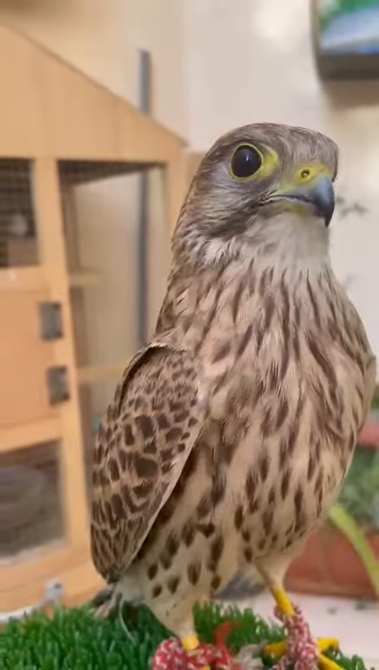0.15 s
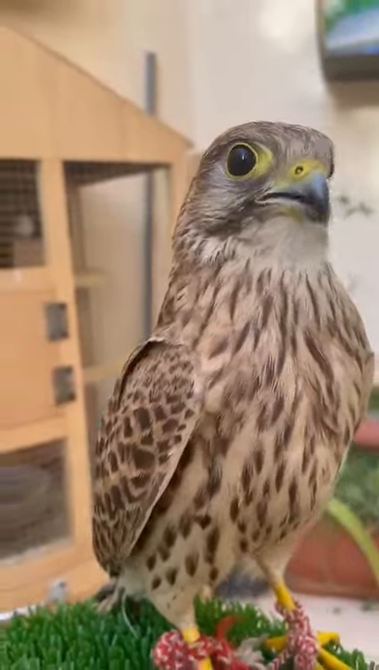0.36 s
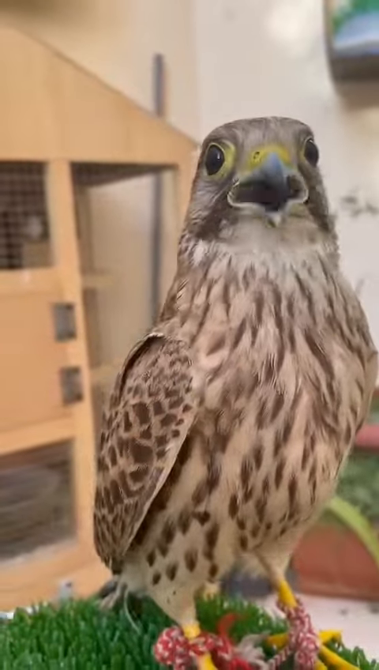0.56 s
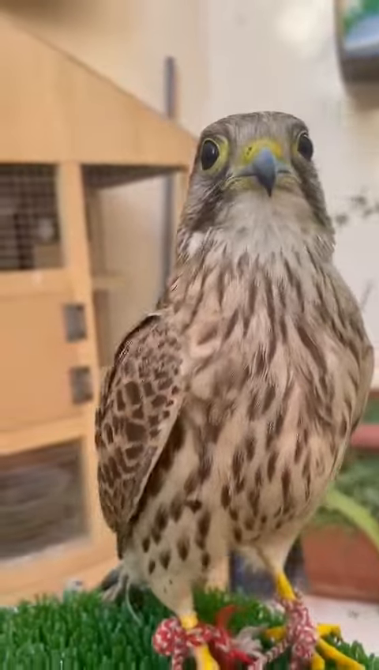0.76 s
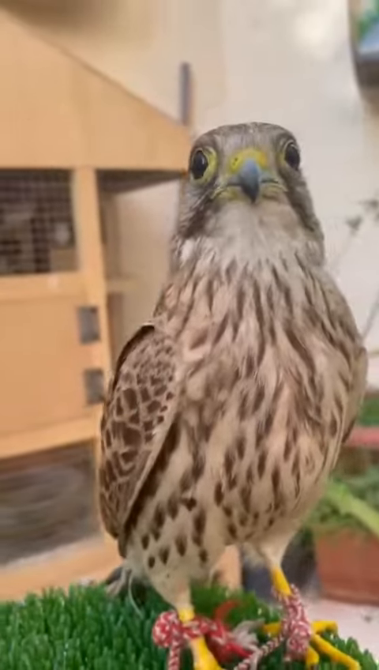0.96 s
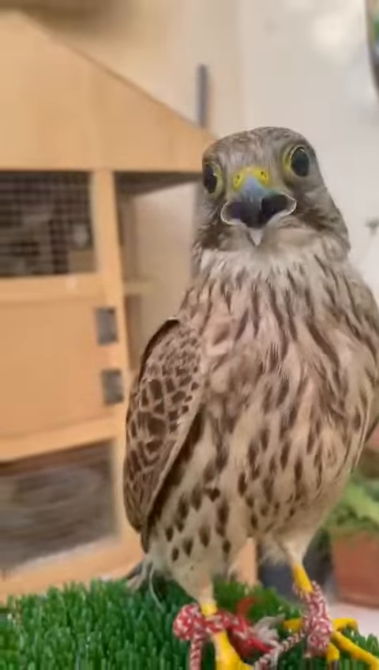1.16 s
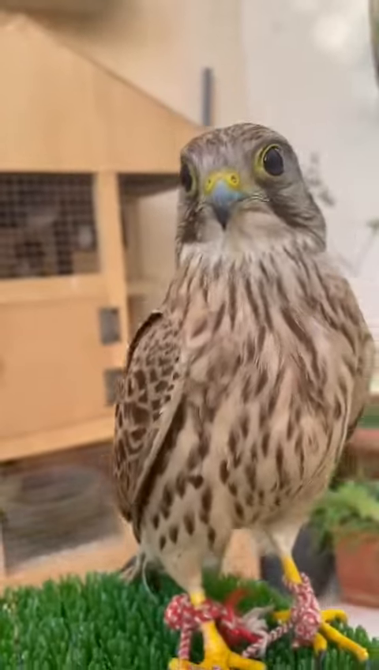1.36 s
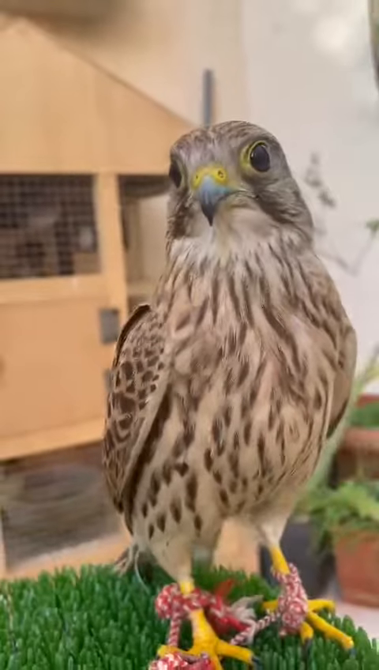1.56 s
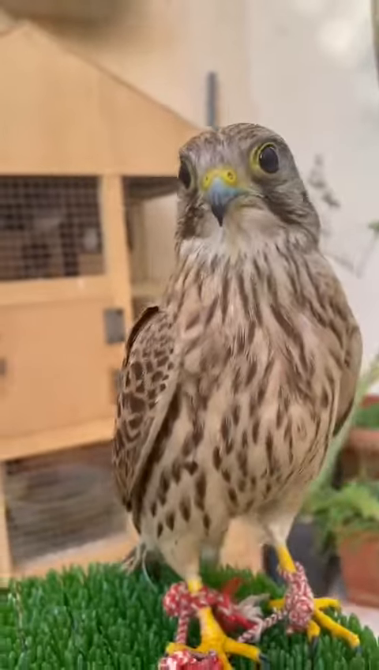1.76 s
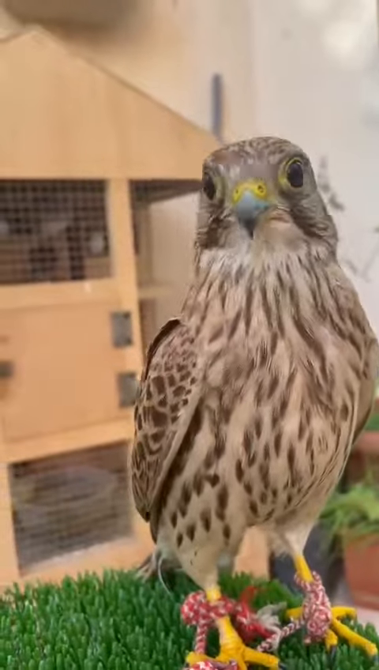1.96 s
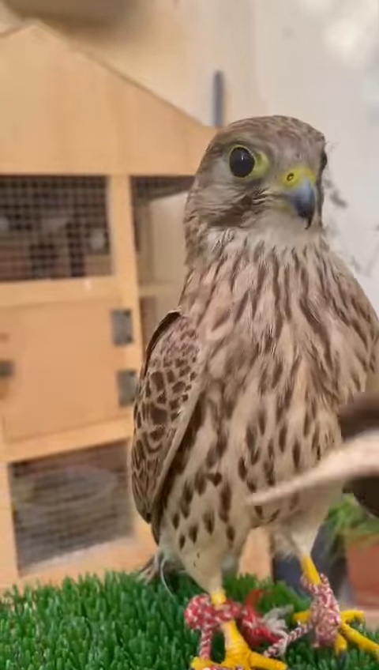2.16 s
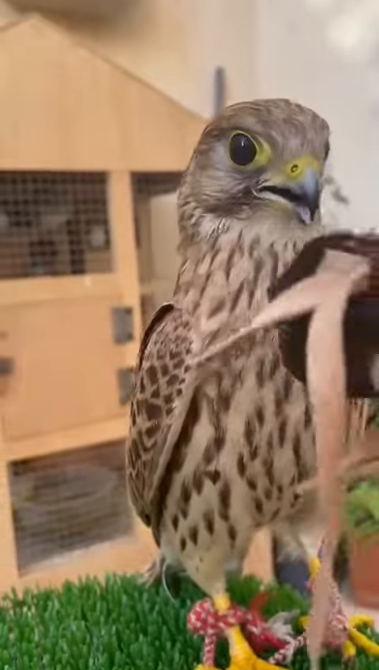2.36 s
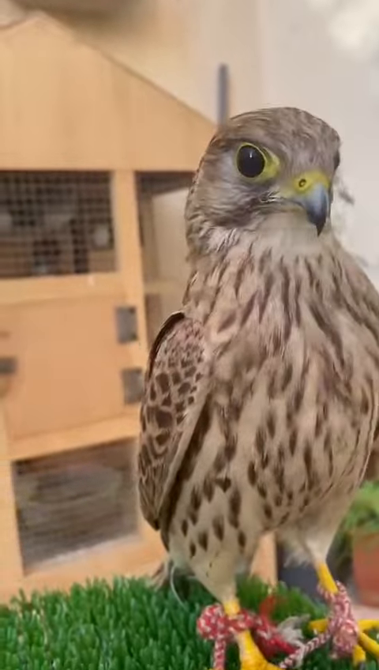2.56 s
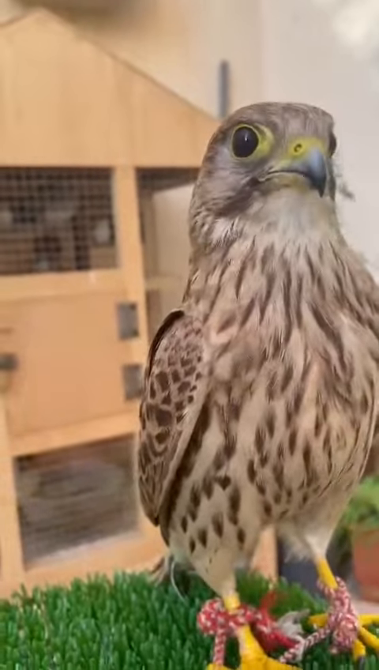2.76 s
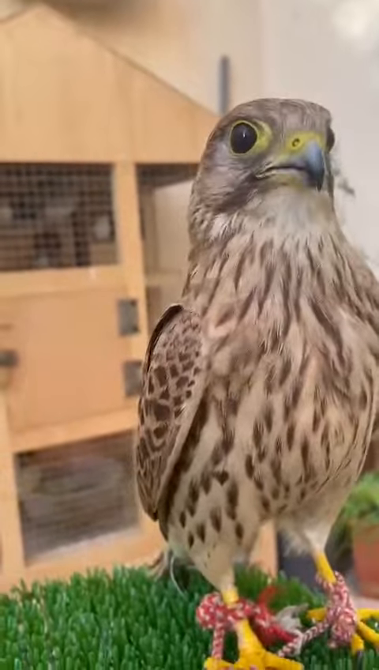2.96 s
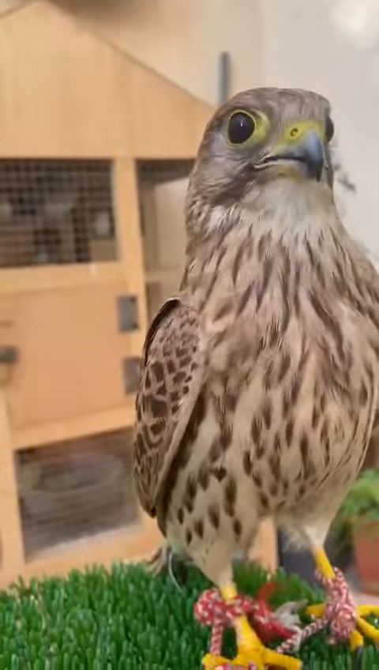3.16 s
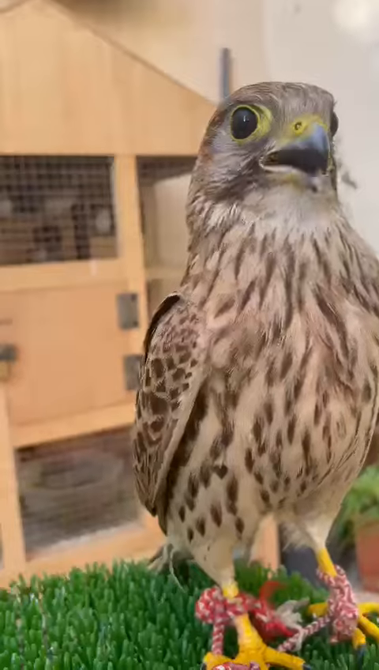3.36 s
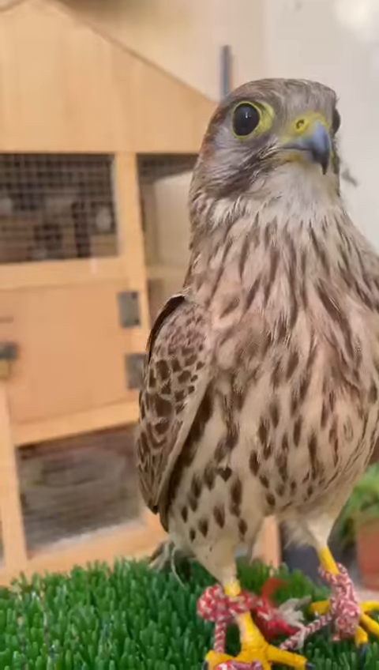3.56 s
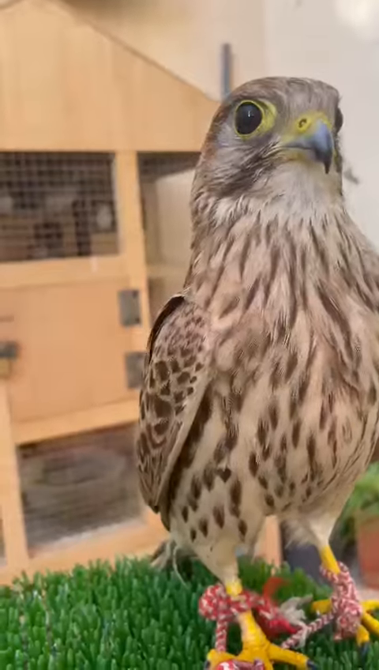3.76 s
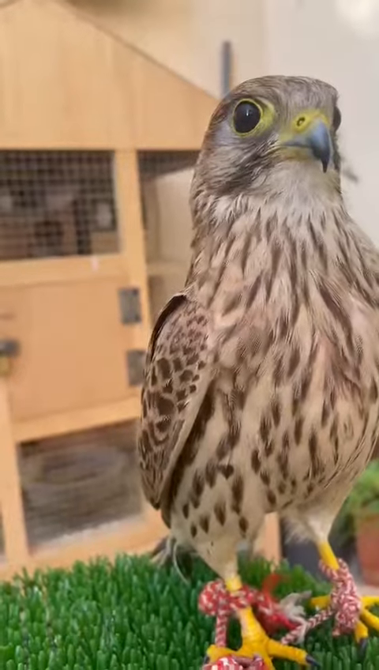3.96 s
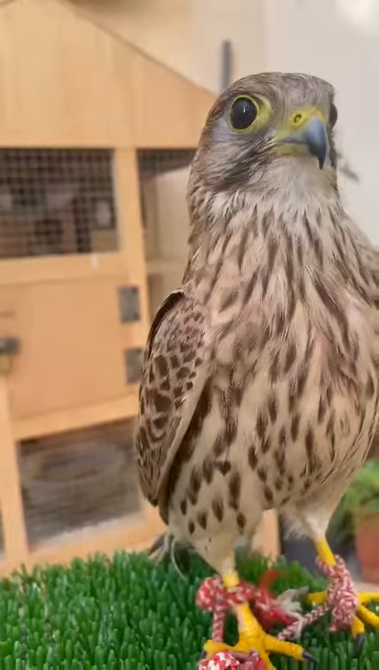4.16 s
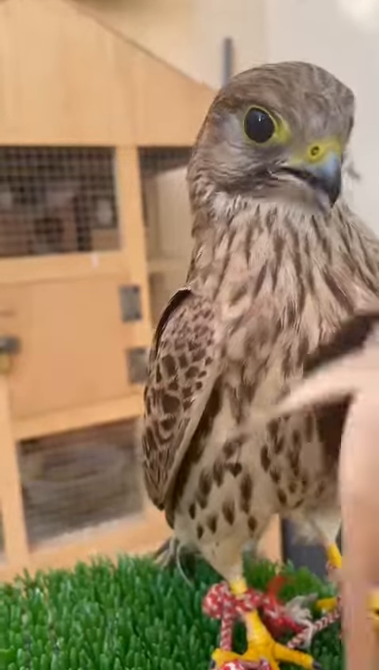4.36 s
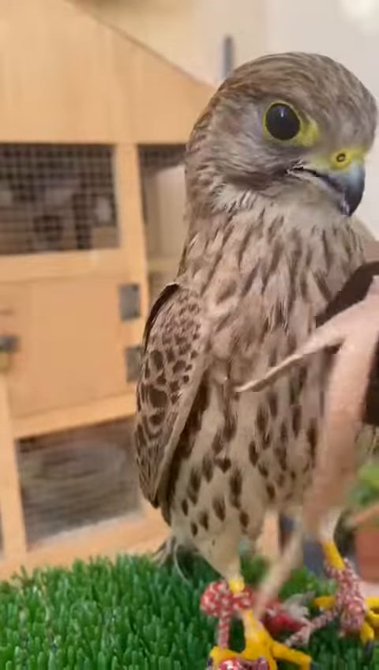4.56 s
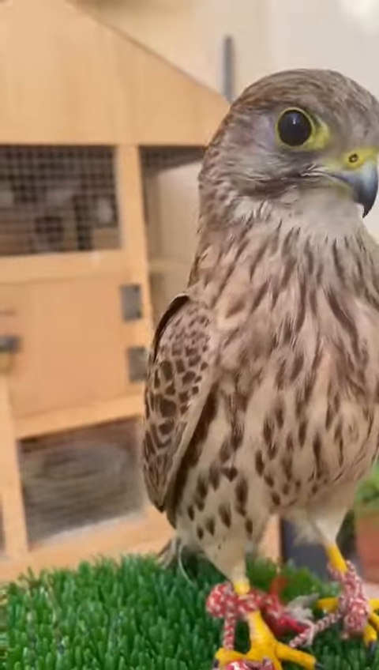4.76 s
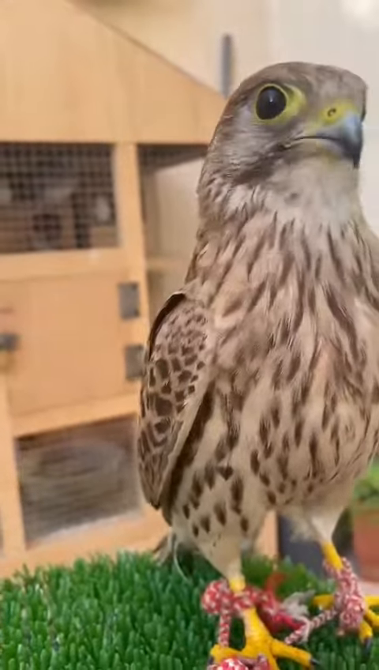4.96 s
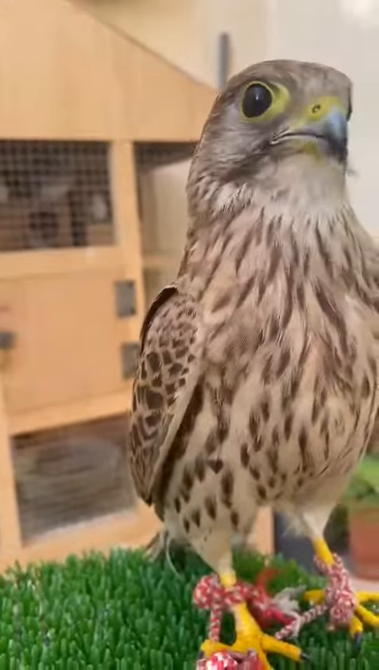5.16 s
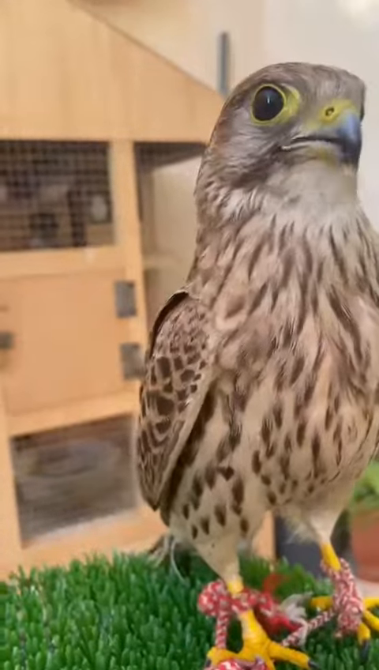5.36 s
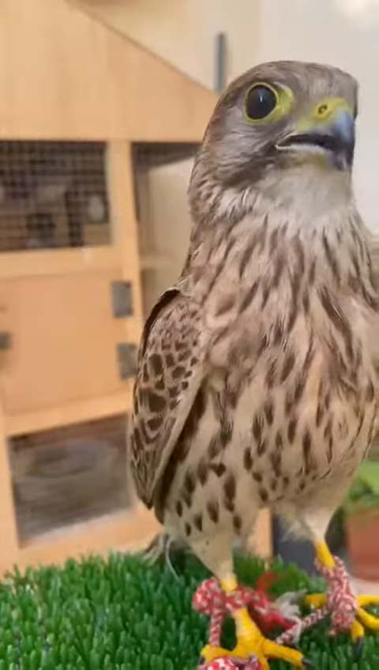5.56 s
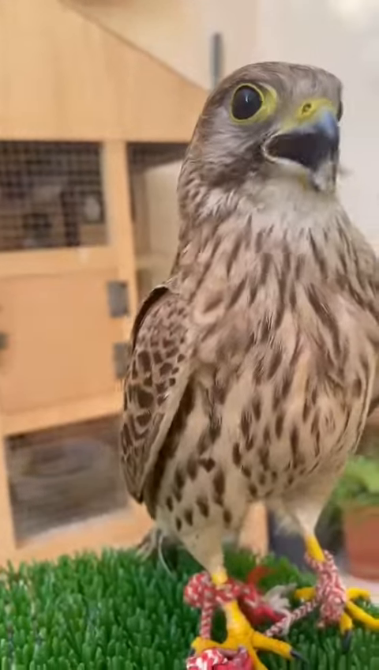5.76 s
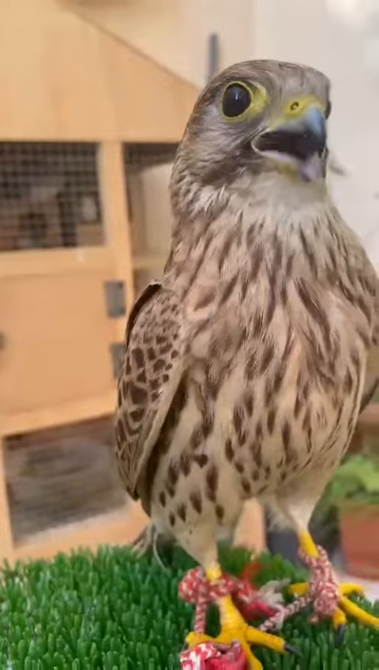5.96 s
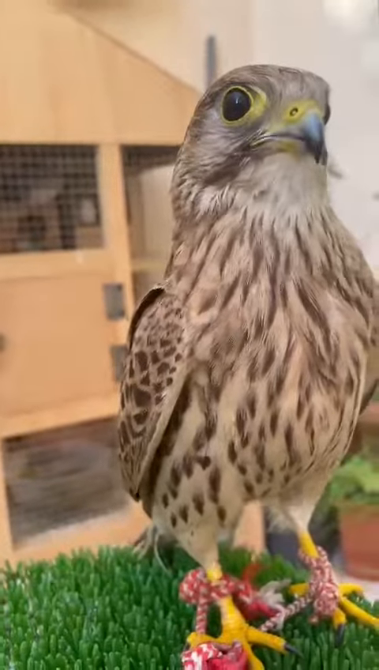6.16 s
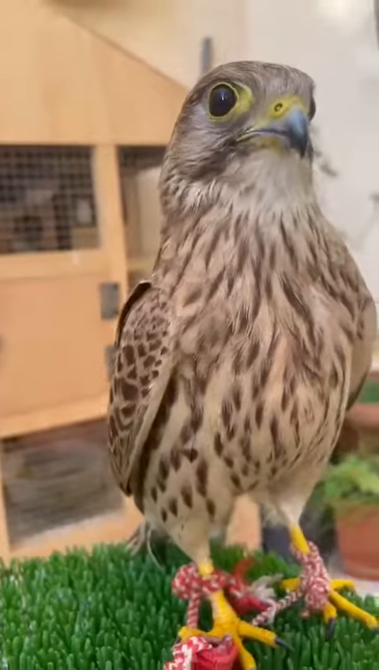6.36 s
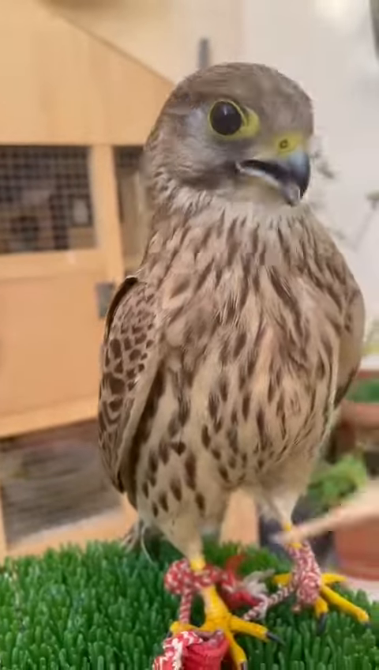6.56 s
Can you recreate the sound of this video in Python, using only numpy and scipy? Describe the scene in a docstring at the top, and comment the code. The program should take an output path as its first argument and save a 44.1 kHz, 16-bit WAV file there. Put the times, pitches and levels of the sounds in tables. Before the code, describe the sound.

A kestrel calls close to a phone in a walled yard. From 0.05 to 1.5 seconds come six sharp keks, roughly 0.3 seconds apart, each under a tenth of a second: a dry throat rasp, a hoarse upward sweep, then a cracked note or short squeal that sags. A pause leaves soft air, a steady hum near 620 Hz and, around 1.9, a faint high whine. A softer kek at 2.27 opens the second run, quicker and shriller, strongest near 3.1 and ending at 3.4. Low rumble swells around 2.8. After a second of quiet, with a barely audible far animal cry at 4.0, a longer, clearer squawk at 4.47 begins the third run, growing rougher, keks every 0.2 to 0.3 seconds until 6.6. Faint blurred distant calls lie beneath from about 6.0. The walls add a short, diffuse, dull echo.

```python
"""Kestrel scolding in a walled yard

A perched kestrel scolds in three runs of kek-kek-kek, close to a phone in a walled aviary yard.
Flap ticks make the dry rasp that opens most keks; summed partials climb hoarsely, split and squeal.
Decaying noise rings as the walls; shaped noise and tones make air, rumble, a machine's hum and a whine.
Gliding, blurred tones are faint far-off animals."""
import sys
import numpy as np
from scipy import signal
from scipy.fft import rfft, irfft, next_fast_len
from scipy.io import wavfile
from scipy.ndimage import uniform_filter1d

SR = 44100
rng = np.random.default_rng(int(sys.argv[2]) if len(sys.argv) > 2 else 0)


def file_out(sig):
    """Save sig as 16-bit WAV at sys.argv[1]."""
    # one column per channel
    cols = np.atleast_2d(sig).T
    # limit, then scale
    lim = np.clip(cols, -1, 1)
    pcm = np.round(lim * 32767).astype(np.int16)
    wavfile.write(sys.argv[1], SR, pcm)


N = 291501
TIME_S = np.arange(N) / SR
FREQS_HZ = np.arange(N + 1) * SR / (2 * N)
TOP_HZ = 12100

# keks, stages in succession; the rasp ends at start_s, length 0 = stage left out:
# start_s, rasp_s, climb_s, split_s, squeal_s, climb_mid_hz, crest_hz, relative_level_db, roughness (0-1)
KEK_STAGES = [(0.051, 0.028, .019, 0.042, 0, 1064, 1262, -0.5, 0.16),
              (0.345, 0.023, 0.031, 0.005, 0.022, 1114, 1565, 0, 0.26),
              (0.6, 0.014, 0.034, 0.0036, 0.028, 1129, 1648, -1, .38),
              (0.878, 0.02, 0.034, 0.0044, 0.02, 1121, 1536, 0, 0.27),
              (1.188, 0.027, 0.028, 0.0054, 0.025, 1109, 1627, -0.5, .31),
              (1.487, 0.0066, 0.029, 0.0042, 0.02, 1108, 1597, -1, 0.32),
              (2.272, 0, 0.044, .039, .026, 1000, 1610, -4, .13),
              (2.458, 0.0073, 0.033, 0.0022, 0.046, 1074, 1718, -1.5, .14),
              (2.703, .016, 0.018, 0.0044, 0.044, 1049, 1722, -.5, .15),
              (2.903, 0.009, 0.029, 0.0043, .044, 998, 1717, 1, 0.26),
              (3.113, 0.016, 0.029, 0.011, .033, 1017, 1697, 1.6, .36),
              (3.373, .024, 0.015, 0.043, 0.0028, 1030, 1292, -0.5, 0.42),
              (4.473, 0, .089, 0.0018, 0.023, 1095, 1660, .3, .09),
              (4.67, 0, 0.03, 0.025, 0.029, 945, 1680, 0, .18),
              (4.888, .006, .033, 0.0029, 0.042, 1054, 1727, 0.5, 0.34),
              (5.096, 0.013, 0.029, 0.0054, 0.038, 1040, 1706, 1, 0.5),
              (5.311, 0.012, 0.036, 0.0025, .039, 1045, 1704, 1, 0.43),
              (5.538, 0.025, 0.027, 0.015, 0.028, 1053, 1668, 0.5, 0.33),
              (5.783, 0.03, 0.024, 0.019, .028, 1012, 1656, 0, .38),
              (5.997, 0.02, 0.03, 0.016, 0.029, 996, 1652, -0.5, 0.31),
              (6.28, 0.011, 0.037, 0.002, .025, 1131, 1600, -2, 0.37),
              (6.58, 0.024, 0.03, 0.0087, .025, 1060, 1660, 1, 0.38)]


def undb(db):
    """Decibels to amplitude gain."""
    return 10 ** (np.asarray(db) / 20)


def unit(x):
    """Scale to an rms of 1."""
    return x / np.sqrt(np.mean(x ** 2) + 1e-18)


def curve(rows, axis=1):
    """Table column against time, linearly interpolated."""
    rows = np.array(rows)
    return np.interp(TIME_S, rows[:, 0], rows[:, axis])


def lookup(rows, hz, axis=1):
    """Table column against frequency, interpolated over log frequency."""
    rows = np.array(rows)
    return np.interp(np.log(np.maximum(hz, 1)), np.log(rows[:, 0]), rows[:, axis])


def shape(x, gain):
    """Filter a whole track by a gain at each of FREQS_HZ."""
    return irfft(rfft(x, 2 * N) * gain)[..., :N]


def walk(size, rate_hz):
    """Smooth random curve: normal draws at rate_hz, joined by straight lines."""
    knots = np.arange(size) * rate_hz / SR
    return np.interp(knots, np.arange(size), rng.standard_normal(size))


def add(track, start_s, sound):
    """Mix a sound into a track at its start time."""
    i = max(int(start_s * SR), 0)
    track[i:i + len(sound)] += sound[:max(N - i, 0)]


def gate(t, length_s, rise_s, fall_s):
    """Quarter-sine opening and closing."""
    opening = np.sin(np.pi / 2 * np.clip(t / rise_s, 0, 1))
    closing = np.sin(np.pi / 2 * np.clip((length_s - t) / fall_s, 0, 1))
    return opening * closing


def background(air_db=-54, side_db=-60, hum_hz=619, hum_db=-52.0, whine_hz=5570):
    """Outdoor air and rumble as shaped noise; a machine's hum and a thin whine as wavering sines."""
    # air spectra, common to both ears and opposed between them: freq_hz, relative_level_db
    air_mid = [(22, -24), (60, 8.5), (105, -4.5), (150, 0.5), (210, -3.5), (450, -6), (780, -5.5),
               (1500, -19.5), (3000, -17.5), (6500, -16), (8000, -23.5), (9500, -51.5)]
    air_side = [(90, -56), (300, -13.5), (800, -5), (1500, -19), (6000, -22.5), (9200, -20), (10500, -29)]
    # gain on air and hum: time_s, gain_db
    swell = [(2, 3), (4.8, 2.5), (5.3, -2), (6.6, 0.5)]
    # rumble: time_s, rms_level_db
    rumble_level = [(1.9, -58.5), (2.8, -48), (3.6, -68), (4.7, -59), (6.6, -66.5)]
    # whine: time_s, rms_level_db
    whine_level = [(1.5, -69), (1.9, -57.5), (2.2, -64.5), (2.6, -67.5)]
    mid = unit(shape(rng.standard_normal(N), undb(lookup(air_mid, FREQS_HZ))))
    side = unit(shape(rng.standard_normal(N), undb(lookup(air_side, FREQS_HZ))))
    air = undb(air_db) * mid + undb(side_db) * side * np.array([[1], [-1]])
    air = air * undb(0.58 * walk(N, 3.5))
    rumble_band = np.exp(-((FREQS_HZ - 53) / 15) ** 2)
    rumble = unit(shape(rng.standard_normal(N), rumble_band)) * undb(curve(rumble_level))
    hum_phase = 2 * np.pi * np.cumsum(hum_hz + 1.1 * walk(N, 7.4)) / SR
    hum = np.sqrt(2) * np.sin(hum_phase + np.array([[.5], [0]]))  # left leads by 0.5 rad
    hum = hum * undb(hum_db + 0.34 * walk(N, 4.2))
    whine_phase = 2 * np.pi * np.cumsum(whine_hz + 8 * walk(N, 52)) / SR
    whine = np.sqrt(2) * np.sin(whine_phase) * undb(curve(whine_level))
    return (air + hum) * undb(curve(swell)) + rumble + whine


def flaps(size, flap_hz=300, loose=0.18):
    """Cycle count of a slack second membrane that flaps slowly and unevenly."""
    return np.cumsum(flap_hz * (1 + loose * walk(size, 300))) / SR


def rasp(length_s, swell_db=10, low_hz=2300, high_hz=3600):
    """Before the voice catches, each flap ticks the throat resonance."""
    t = np.arange(int((length_s + .005) * SR)) / SR
    cycles = flaps(len(t))
    ticks = np.diff(np.floor(cycles + .5), prepend=0)
    breath = .2 * rng.standard_normal(len(t)) * np.exp(-4 * (cycles % 1))
    band = signal.butter(2, [low_hz, high_hz], "band", fs=SR, output="sos")
    ring = signal.sosfilt(band, ticks + breath)
    return unit(ring) * undb(swell_db * (t / length_s - 1)) * gate(t, t[-1], .004, .004)


def through_throat(x):
    """Colour a short burst by the throat and beak resonances, then level it."""
    # throat and beak: freq_hz, relative_gain_db
    resonances = [(450, -56.5), (820, -18.5), (1120, -17.5), (1640, -22.5), (2250, -9.5), (2720, -3.5),
                  (3220, 2), (3760, -8), (4420, -7.5), (5150, -20), (6020, -8.5), (6660, -10),
                  (7420, -21.5), (8520, -8), (10050, -14.5), (10950, -20.5)]
    size = next_fast_len(len(x) + 512)
    hz = np.arange(size // 2 + 1) * SR / size
    coloured = irfft(rfft(x, size) * undb(lookup(resonances, hz)), size)
    return unit(coloured[:len(x)])


def syrinx(hz, push, jitter, shimmer_db, hiss, half_db, flutter=0, dull_db=16):
    """Membranes beat unsteadily, duller at low push; uneven beats give half lines."""
    size = len(hz)
    phase = 2 * np.pi * np.cumsum(hz * (1 + jitter * walk(size, 409))) / SR
    k = np.arange(1, 25)[:, None] / 2  # multiples of the pitch, halves included
    tilt_db = dull_db * (push - 1) * np.log2(np.maximum(k * hz / 3300, 1))
    half_line_db = np.minimum(half_db, 0) * (k % 1 > 0)
    gains = undb(tilt_db + half_line_db) * (k * hz < TOP_HZ + 1000)
    beats = unit(np.sum(gains * np.cos(k * phase + k ** 2), axis=0))
    air = hiss * rng.standard_normal(size) * (1 + np.cos(phase))  # air escapes once a cycle
    shimmer = undb(shimmer_db * walk(size, 441.0))
    flapping = 1 + flutter * np.cos(2 * np.pi * flaps(size))
    voice = through_throat((beats + air) * shimmer * flapping)
    # level the voice evenly, so that the stage levels set its loudness
    return voice / np.sqrt(uniform_filter1d(voice ** 2, size=360) + 1e-9)


def climbs(rasp_db=-4.5, flutter=1.3):
    """Hoarse rise after any rasp: the third partial sweeps into the resonance; flapping adds sidebands."""
    # a strained, rough voice breaks to the next register at a higher pitch
    sweep_hz, typical_climb_s, break_hz, strain_hz = 115, 0.0301, 1107.3, 296
    # lower and longer climbs start softer
    climb_db, full_start_hz, soft_db_per_hz, soft_db_per_s = -14.5, 1101.6, 0.1, 110
    # the voice catches quickly out of a rasp, slowly without one
    quick_catch_s, slow_catch_s = .003, .018
    out = np.zeros(N)
    for start_s, rasp_s, length_s, _, _, mid_hz, _, level_db, rough in KEK_STAGES:
        t = np.arange(int((length_s + .003) * SR)) / SR
        along = t / t[-1]
        first_hz = mid_hz - sweep_hz * np.sqrt(length_s / typical_climb_s)
        hz = np.interp(along, [0, .5, 1], [first_hz, mid_hz, break_hz + strain_hz * rough])
        full_db = level_db + climb_db
        first_db = full_db - soft_db_per_hz * (full_start_hz - mid_hz) - soft_db_per_s * length_s
        db = np.interp(along, [.15, .65], [first_db, full_db])
        push = np.interp(along, [0, .6], [.6, 1])
        voice = syrinx(hz, push, jitter=0.076 * rough, shimmer_db=4.7 * rough, hiss=0.5 * rough,
                       half_db=-28.0 + 31.0 * rough, flutter=flutter * rough)
        catch_s = quick_catch_s if rasp_s > 0 else slow_catch_s
        add(out, start_s, voice * undb(db) * gate(t, t[-1], catch_s, .005))
        if rasp_s > 0:
            add(out, start_s - rasp_s, rasp(rasp_s) * undb(first_db + rasp_db))
    return out


def splits(split_hz=1295, split_db=-12, fade_db_per_s=70):
    """Strong and weak beats alternate; the half line at 2.5 times the pitch takes the resonance."""
    out = np.zeros(N)
    for start_s, _, climb_s, length_s, _, _, crest_hz, level_db, rough in KEK_STAGES:
        if length_s > 0:
            t = np.arange(int((length_s + .004) * SR)) / SR
            arch = (2 * t / t[-1] - 1) ** 2  # 1 at the ends, 0 midway
            hz = min(split_hz, crest_hz) * (1.012 - 0.0742 * arch)
            voice = syrinx(hz, 1 - .5 * arch, jitter=0.057 * rough, shimmer_db=2.0,
                           hiss=1.4 * rough, half_db=-1.5)
            db = level_db + split_db + 2 - 5 * arch - fade_db_per_s * t
            add(out, start_s + climb_s, voice * undb(db) * gate(t, t[-1], .003, .009))
    return out


def squeals(end_hz=1470, climb_hz_per_s=3500):
    """The second partial arches through the resonance, then sags, dulls and frays as pressure runs out."""
    # a longer hold before the sag peaks louder; the sag takes fall_s, or the whole of a shorter squeal
    squeal_db, hold_db_per_s, fall_s, tail_db = -13, 200, 0.02, -15.5
    out = np.zeros(N)
    for start_s, _, climb_s, split_s, length_s, _, crest_hz, level_db, _ in KEK_STAGES:
        if length_s > 0:
            t = np.arange(int((length_s + .002) * SR)) / SR
            rise_s = max(length_s - fall_s, 0)
            sag = np.clip((t - rise_s) / (length_s - rise_s), 0, 1) ** 1.28
            hz = crest_hz - climb_hz_per_s * np.maximum(rise_s - t, 0) - (crest_hz - end_hz) * sag
            stage_db = [squeal_db + hold_db_per_s * rise_s, tail_db, tail_db - 3.5]
            db = level_db + np.interp(t / length_s, [.35, .75, 1], stage_db)
            voice = syrinx(hz, 1 - sag, jitter=.006 + .012 * sag, shimmer_db=1.6,
                           hiss=.09, half_db=-32 + 14 * sag)
            add(out, start_s + climb_s + split_s, voice * undb(db) * gate(t, t[-1], .003, .006))
    return out


def yard(x, t60_s=0.43, wet_db=-21.5, build_s=0.015, damp_hz=4700):
    """The walls return a diffuse, duller tail, unrelated at the two ports."""
    t = np.arange(SR) / SR
    decay = np.exp(-np.log(1000) * t / t60_s) * np.clip(t / build_s, 0, 1)
    response = rng.standard_normal((2, SR)) * decay / np.sqrt(np.sum(decay ** 2))
    tail = signal.fftconvolve(x[None], response, axes=1)[:, :N]
    return undb(wet_db) * shape(tail, 1 / (1 + (FREQS_HZ / damp_hz) ** 4))


def kestrel(gape_hz=4550, gape_width_hz=600, gape_db=7, direct_db=-3.0):
    """The voice leaves the beak, shriller as it gapes, and reaches both ports as the head turns."""
    # treble: time_s, gain_db
    treble_gain = [(.1, -1.5), (.65, -4.5), (1.2, -0.5), (1.5, -5), (2.3, 1), (3.2, -1), (6.05, -1.5),
                   (6.3, -9.5), (6.6, -4)]
    # beak gape, lifting an upper resonance: time_s, gape (0-1)
    beak_gape = [(.1, .2), (.3, 0), (1.6, 0), (2.25, 1), (2.36, 1), (2.5, .1), (3.5, 0), (4.45, 1),
                 (4.58, 1), (4.72, .1), (4.95, 0)]
    # two microphone ports: freq_hz, left_lead_rad, left_minus_right_db
    port_response = [(278, .3, -4), (970, 2.25, 0), (1864, 0.49, 5.5), (2496, 3.02, 5.5), (2840, 5.43, 5.5),
                     (3370, 4.78, -3), (3730, 4.75, -4.5), (4740, 4.77, -2.5), (6080, 6.81, 1.5),
                     (8250, 9.097, -1), (11300, 9.24, 1)]
    # head turn: time_s, left_minus_right_db
    head_turn = [(.3, 2), (.9, -1), (1.5, 2.5), (2.45, -1.5), (2.8, 1.5), (3.4, -2), (4.5, -1.5),
                 (4.9, -0.5), (5.3, -2), (6.1, -1), (6.6, 1)]
    voice = climbs() + splits() + squeals()
    treble = shape(voice, 1 - 1 / (1 + (FREQS_HZ / 5200) ** 8))
    upper = shape(voice, np.exp(-((FREQS_HZ - gape_hz) / gape_width_hz) ** 2))
    treble_change = treble * (undb(curve(treble_gain)) - 1)
    gape_change = upper * (undb(gape_db * curve(beak_gape)) - 1)
    voice = voice + treble_change + gape_change
    sides = np.array([[1], [-1]]) / 2
    port_gain = undb(sides * lookup(port_response, FREQS_HZ, axis=2))
    port_phase = np.exp(1j * sides * lookup(port_response, FREQS_HZ))
    turn = undb(sides * curve(head_turn))
    turn = turn / np.sqrt(np.mean(turn ** 2, axis=0))  # constant power over the two sides
    direct = shape(voice, port_gain * port_phase) * turn * undb(direct_db)
    return direct + yard(voice)


def far_calls():
    """Faint drawn-out animal calls: gliding tones with overtones, blurred by distance."""
    # calls before the blur: start_s, length_s, first_hz, last_hz, relative_level_db, overtones_db
    calls = [(4.0, 0.2, 1192, 1126, -69.5, 3), (6.032, 0.18, 1212, 1180, -74, -32),
             (6.328, 0.37, 1042, 1021, -61, -15)]
    out = np.zeros(N)
    for start_s, length_s, first_hz, last_hz, db, overtones_db in calls:
        t = np.arange(int(length_s * SR)) / SR
        hz = np.interp(t, [0, length_s], [first_hz, last_hz]) * (1 + 0.0049 * walk(len(t), 85))
        phase = 2 * np.pi * np.cumsum(hz) / SR
        overtones = np.sin(2 * phase) + .5 * np.sin(3 * phase / 2)
        tone = np.sin(phase) + undb(overtones_db) * overtones
        add(out, start_s, tone * undb(db) * np.sin(np.pi * t / length_s))
    return out + yard(out, t60_s=0.72, wet_db=15.0)


def scene():
    """The bird in front, far animals and background behind."""
    return kestrel() + far_calls() + background()


def record(dry):
    """The phone cuts everything above TOP_HZ with a steep low-pass."""
    return signal.sosfilt(signal.ellip(12, .2, 90, TOP_HZ, fs=SR, output="sos"), dry)


dry = scene()
out = record(dry)
file_out(out)
```